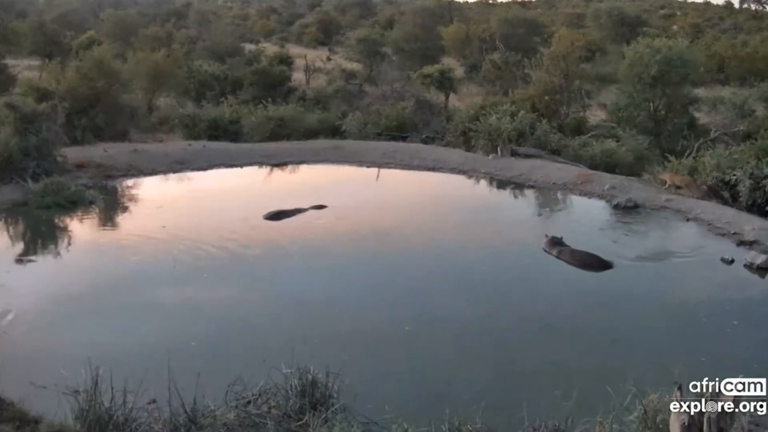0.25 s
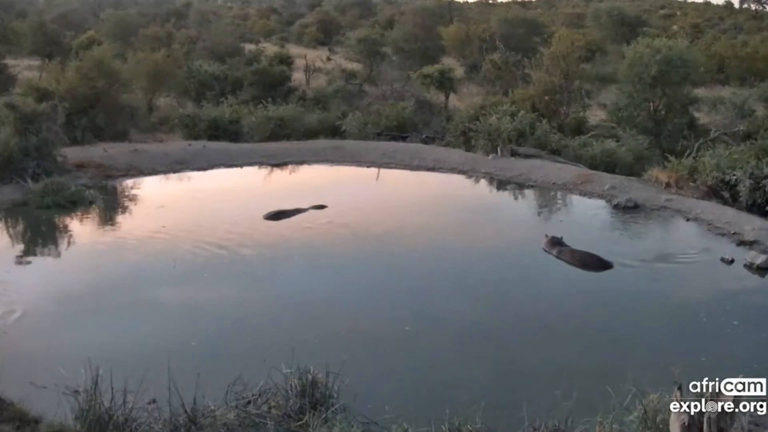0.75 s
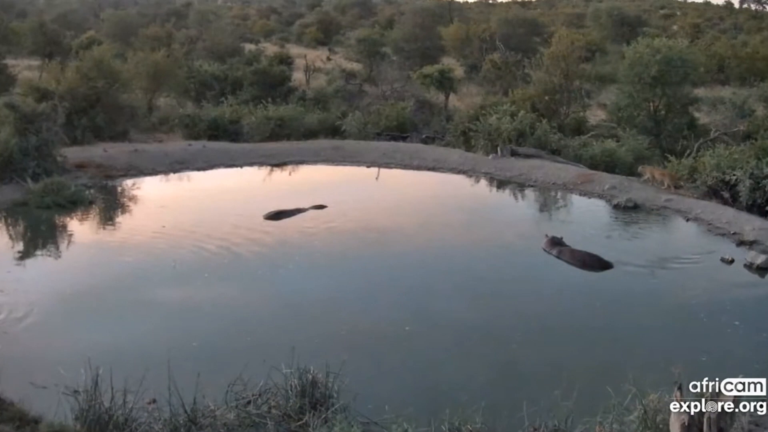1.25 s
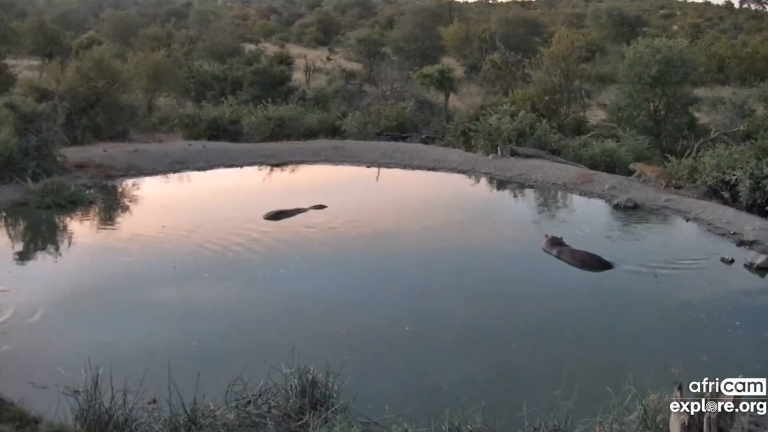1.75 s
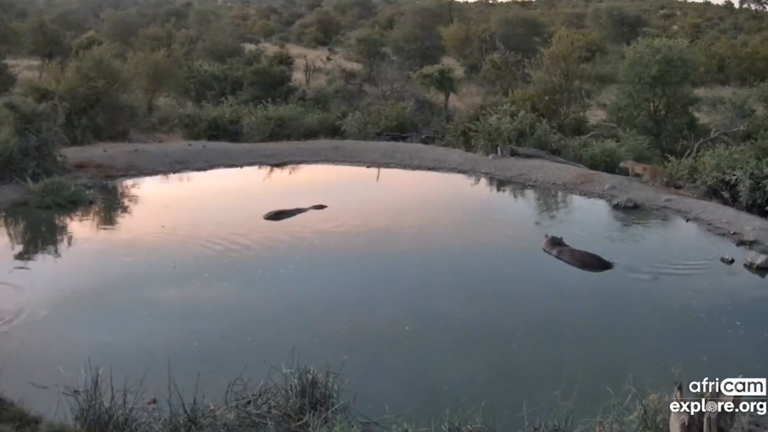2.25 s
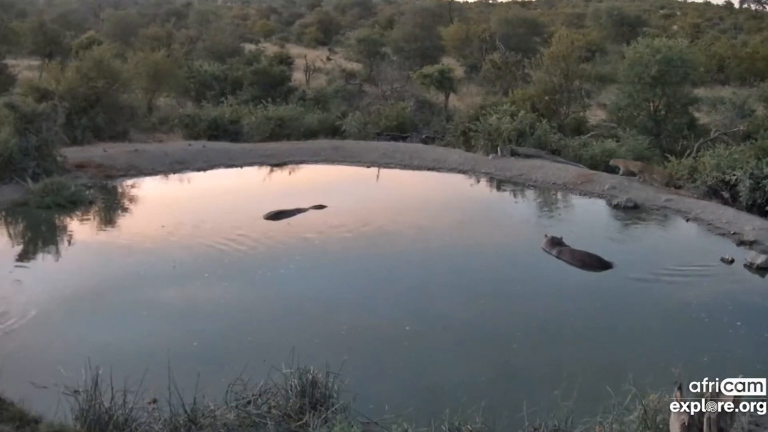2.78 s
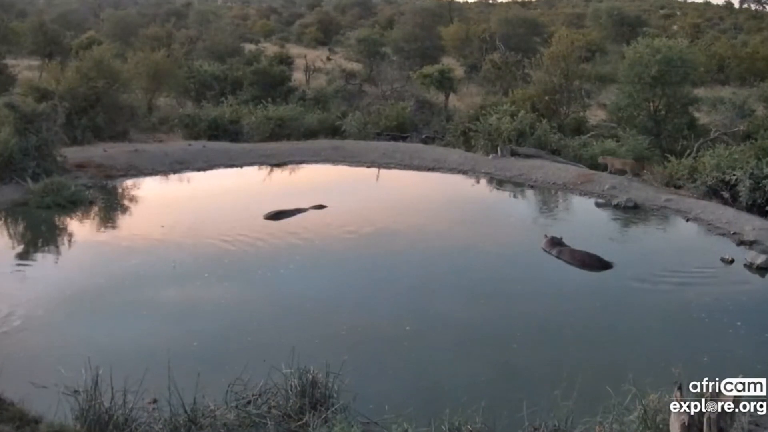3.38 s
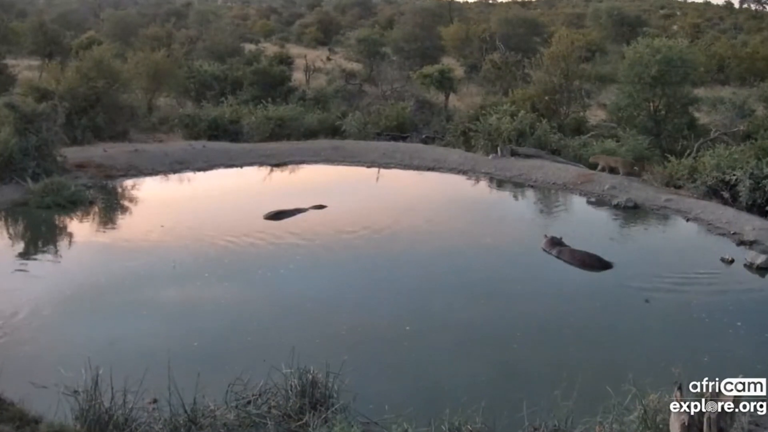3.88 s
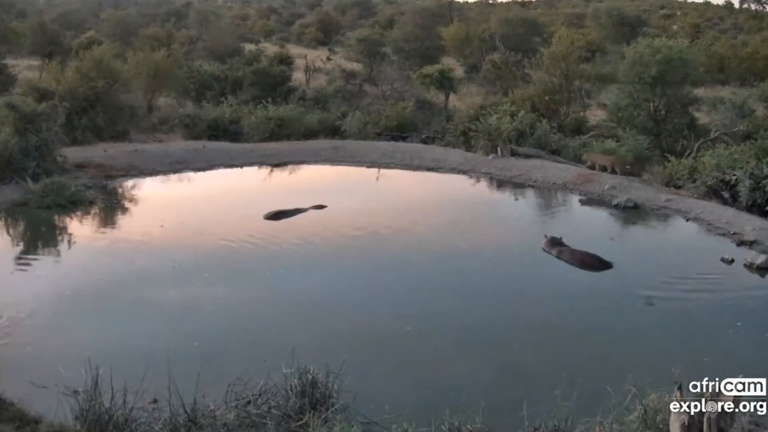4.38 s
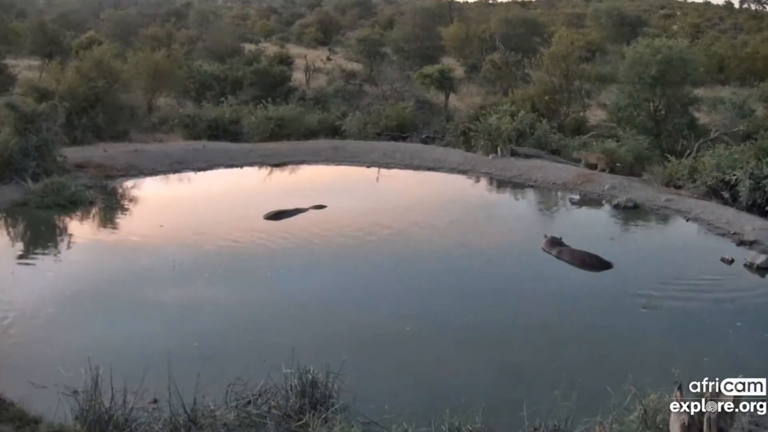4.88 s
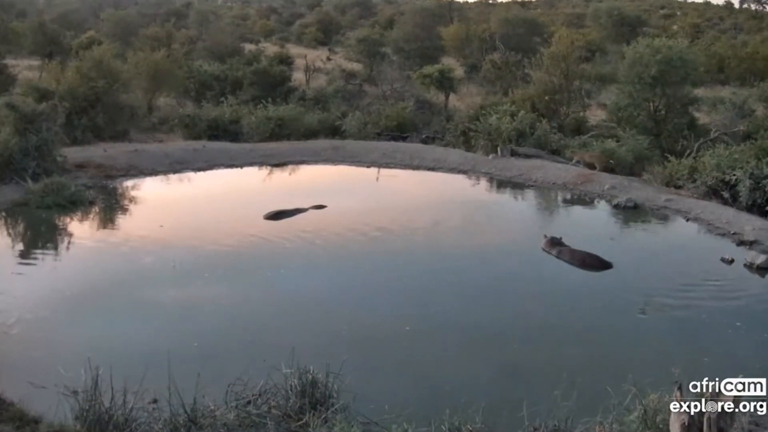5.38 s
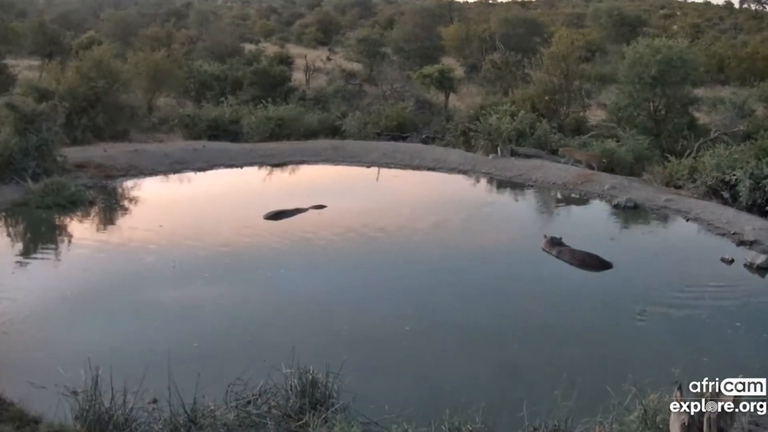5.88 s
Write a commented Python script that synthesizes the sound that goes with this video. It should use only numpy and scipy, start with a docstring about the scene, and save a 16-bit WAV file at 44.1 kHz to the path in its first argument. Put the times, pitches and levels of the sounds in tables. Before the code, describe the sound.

A bird whistles two rising phrases, warbles, then squawks and rasps over softly buzzing insects at a waterhole.

```python
"""Insects hiss and buzz in swells over a low motor hum, and small plops ring at a bush waterhole.
After a faint, far call, a bird whistles two rising phrases, the second ending in a quick warble;
a nasal squawk and a rasp follow. The whistle is an almost pure tone from the syrinx, the harsh calls
are stacks of partials mixed with turbulent air, and the insects are bands of noise.
The scrub scatters every call back across the water."""
import sys
import numpy as np
from scipy import signal
from scipy.fft import rfft, irfft
from scipy.io import wavfile
from scipy.ndimage import uniform_filter1d

SR = 44100
rng = np.random.default_rng(int(sys.argv[2]) if len(sys.argv) > 2 else 0)


def store_pcm(level_fs):
    """Save levels as 16-bit WAV."""
    pcm = np.round(np.clip(level_fs, -1, 1) * 32767).astype(np.int16)
    wavfile.write(sys.argv[1], SR, np.atleast_2d(pcm).T)


N = 270774
TIME = np.arange(N) / SR

# Spectra of the steady air and insect hiss. Each row: frequency in Hz, relative density in dB.
AIR_SPECTRUM = [(30, -48), (55, -46), (75, -24), (100, -19.5), (128, -6), (170, 1), (250, -4.5),
                (400, -7.5), (600, -11), (800, -18.5), (1100, -8), (1500, -5.5), (2200, -8), (3000, -23)]
INSECT_SPECTRUM = [(1500, -22), (2200, -6.5), (2700, 0), (3100, 2), (3800, 0), (4400, 0.5), (5200, -4.5),
                   (6000, -7), (7000, -8.5), (8000, -14), (9500, -14.5), (11000, -10), (12200, -11)]
# Hum of a distant motor. Each row: multiple of its turning rate, relative level in dB.
MOTOR_HARMONICS = [(3, -92), (5, -80), (6, -67.5), (7, -75), (9, -87), (10, -77), (11, -79), (12, -92),
                   (13, -85), (14, -76.5), (15, -81), (18, -86)]
# Buzzing swells in the bushes. Each row: time of the crest in seconds, level in dB.
BUZZ_SWELLS = [(.36, -59.5), (.905, -49.5), (1.59, -56), (2.115, -49), (2.70, -57), (3.21, -49.6),
               (3.82, -59.5), (4.25, -56), (4.66, -50), (5.22, -55.5), (5.55, -58.5), (5.80, -51.2),
               (6.07, -59.5)]
# A loud swell stops sooner, sits lower and rattles more. Each pair: soft swell, loud swell.
SWELL_RANGE_DB, SWELL_FALL_S, SWELL_HZ, SWELL_RATTLE = (-56, -50), (.095, .039), (4980, 4800), (.2, .44)
# Thin notes that lead into loud buzzes.
# Each row: start in seconds, length in seconds, opening pitch in Hz, relative level in dB.
LEAD_IN_NOTES = [(.74, .20, 4400, -56.5), (1.91, .15, 4360, -55.5)]
# Plops and ticks at the water's edge.
# Each row: start in seconds, level in dB, pitch in Hz, time to decay by 60 dB in seconds.
WATER_PLOPS = [(.022, -36, 1283, 0.036), (.61, -46, 1380, .04), (1.224, -42.5, 490, 0.022),
               (3.94, -39, 4600, .025), (5.461, -33, 1340, 0.015)]
# Echoes from the banks. Each row: delay in seconds, gain before filtering in dB.
BANK_ECHOES = [(.09, -21.5), (.145, -24.5)]

# Nasal calls. Each holds: start and length in seconds, opening and top pitch in Hz,
# level in dB, closing sag as a share of the pitch.
DISTANT_CALL = (1.985, .193, 510, 598, -56.6, .09)
SQUAWK_CALL = (4.312, .197, 685, 1072, -34.2, .06)
# Partials of the harsh voices; the squawk has side tones between its harmonics.
# Each row: multiple of the pitch, relative level in dB.
DISTANT_HARMONICS = [(3, -7.5), (4, -4.5), (5, -5)]
SQUAWK_OVERTONES = [(1.31, -29), (2, -16), (2.34, -24), (2.62, -12), (3, -.5), (3.38, -17), (3.62, -12.5),
                    (3.9, -20), (4, -19)]
RASP_HARMONICS = [(2, -18), (3, -2.5), (4, -9.5)]
# Throat resonances in the rasp. Each row: centre in Hz, width in Hz, relative level in dB.
THROAT_MODES = [(1624, 360, -19.5), (2280, 550, -14), (3120, 820, -5.5), (3830, 330, -0.5), (4130, 150, -5),
                (4570, 600, -5)]

# Whistled phrases; the climb changes pace at a knee. Each row: start in seconds, opening and low pitch
# in Hz, knee in seconds and Hz, crest in seconds and Hz, closing pitch in Hz, base level in dB.
WHISTLE_PHRASES = [(2.530, 1490, 1172, 2.938, 1530, 3.079, 2060, 1305, -30.2),
                   (3.414, 1555, 1330, 3.560, 1720, 3.648, 2020, 1365, -30.8)]
# Quick notes of the warble. Each row: time of the top in seconds, top pitch in Hz, base level in dB.
WARBLE_NOTES = [(3.772, 1920, -29.8), (3.845, 1918, -29.8), (3.918, 1895, -30.2), (3.988, 1820, -30),
                (4.048, 1780, -30.6), (4.101, 1660, -32.3)]
# How strongly each pitch of the whistle carries. Each row: pitch in Hz, gain in dB.
WHISTLE_CARRY = [(1200, -11.5), (1265, -8.5), (1355, .3), (1410, -.8), (1470, .3), (1620, -1), (1765, 3.2),
                 (1900, .6), (2015, -.3), (2060, 4)]


def from_db(db):
    """Decibels measure an amplitude ratio logarithmically."""
    return 10 ** (np.asarray(db) / 20)


def rms_one(x):
    """Dividing by the rms gives unit power."""
    return x / np.sqrt(np.mean(x ** 2) + 1e-20)


def ramp(start_s, length_s):
    """A linear rise from 0 to 1."""
    return np.clip((TIME - start_s) / length_s, 0, 1)


def gate(start_s, end_s, edge_s):
    """A time window with sloping edges."""
    return ramp(start_s - edge_s / 2, edge_s) - ramp(end_s - edge_s / 2, edge_s)


def phase_of(hz):
    """Phase is the integral of frequency."""
    return 2 * np.pi * np.cumsum(hz) / SR


def shaped_noise(gain_at):
    """Spectral shaping: white noise weighted at each frequency, at unit rms."""
    hz = np.arange(N // 2 + 1) * SR / N + 1e-3
    return rms_one(irfft(rfft(rng.standard_normal(N)) * gain_at(hz), N))


def coloured_noise(points):
    """Broadband noise follows a (Hz, dB) spectrum, interpolated in log frequency."""
    at, db = np.transpose(points)
    return shaped_noise(lambda hz: from_db(np.interp(np.log(hz), np.log(at), db)))


def resonant_noise(centre_hz, width_hz):
    """A resonance passes the noise near its centre."""
    return shaped_noise(lambda hz: 1 / (1 + ((hz - centre_hz) / width_hz * 2) ** 2))


def noise_around(phase, width_hz):
    """Quadrature modulation centres a band of noise on a moving frequency."""
    def skirt(hz):
        return 1 / np.sqrt(1 + (2 * hz / width_hz) ** 6)
    return shaped_noise(skirt) * np.sin(phase) + shaped_noise(skirt) * np.cos(phase)


def drift(rate_hz):
    """Low-passed noise gives a random wander of unit rms."""
    return shaped_noise(lambda hz: 1 / (1 + (hz / rate_hz) ** 2))


def motor_hum(turning_hz, gain_db, waver_db):
    """Periodic rotation radiates harmonics of the turning rate; each wavers a little in level."""
    return np.sqrt(2) * sum(from_db(db + gain_db + waver_db * drift(3.9))
                            * np.sin(2 * np.pi * (k * turning_hz * TIME + rng.random()))
                            for k, db in MOTOR_HARMONICS)


def insect_buzz(stroke_hz, rise_s, climb_hz_per_s, width_hz):
    """Amplitude modulation chops a swelling, climbing band of noise into a rattle."""
    crest_s, db = np.array(BUZZ_SWELLS).T[:, :, None]
    fall_s, centre_hz, depth = (np.interp(db, SWELL_RANGE_DB, pair)
                                for pair in (SWELL_FALL_S, SWELL_HZ, SWELL_RATTLE))
    age = TIME - crest_s
    taper = np.where(age < 0, 2 * (age / rise_s) ** 2, (age / fall_s) ** 4)
    power = from_db(db) ** 2 * np.exp(-taper) + 1e-18
    share = power / power.sum(0)   # overlapping swells blend by their power
    hz = (share * (centre_hz + climb_hz_per_s * age)).sum(0)
    chop = np.tanh(2 * np.sin(phase_of(stroke_hz * (1 + .077 * drift(18.6)))))
    rattle = rms_one(1 + (share * depth).sum(0) * chop)
    return np.sqrt(power.sum(0)) * rattle * noise_around(phase_of(hz), width_hz)


def lead_ins(gain_db, climb_hz_per_s):
    """Linear frequency sweeps: thin, noisy notes creep upward."""
    out = np.zeros(N)
    for start, length, opening_hz, db in LEAD_IN_NOTES:
        hz = opening_hz + climb_hz_per_s * length * ramp(start, length)
        level = gate(start, start + length, edge_s=.03) * from_db(db + gain_db)
        out += level * whistle(hz, jitter=.0071, flutter_db=1, noise_db=-2)
    return out


def plops(attack_s):
    """Damped oscillation: each plop is a sinusoid that decays exponentially."""
    out = np.zeros(N)
    for start, db, hz, t60 in WATER_PLOPS:
        age = np.maximum(TIME - start, 0)
        level = from_db(db - 60 * age / t60) * (1 - np.exp(-age / attack_s))
        out += level * np.sin(2 * np.pi * hz * age)
    return out


def scrub_echoes(x, near_db, near_t60, far_db, far_t60):
    """Scattering: ground and near twigs answer at once, banks and far bushes later, all band-limited."""
    age = TIME[:int(1.5 * SR)]
    response = np.zeros(len(age))
    for db, t60, onset_s in [(near_db, near_t60, .002), (far_db, far_t60, .04)]:
        scatter = rng.standard_normal(len(age)) * from_db(-60 * age / t60) * (1 - np.exp(-age / onset_s))
        response += from_db(db) * scatter / np.linalg.norm(scatter)
    for delay, db in BANK_ECHOES:
        response[int(delay * SR)] += from_db(db)
    band = signal.butter(2, [1300, 2700], "band", fs=SR, output="sos")
    return signal.fftconvolve(x, signal.sosfilt(band, response))[:N]


def ground_notch(x, notch_hz, width_hz, depth):
    """Destructive interference: reflections weaken one narrow band, so a glide dips on crossing it."""
    b, a = signal.iirnotch(notch_hz, notch_hz / width_hz, fs=SR)
    return x + depth * (signal.lfilter(b, a, x) - x)


def reed(hz, partials, jitter, rough):
    """Superposition: partials share one unsteady pitch, each fluttering in level on its own."""
    phase = phase_of(hz * (1 + jitter * drift(253)))
    return np.sqrt(2) * sum(from_db(db) * np.sin(k * phase + rng.uniform(0, 2 * np.pi))
                            * (1 + rough * drift(200)) for k, db in partials)


def nasal_call(call, partials, jitter, rough, swell_db, hoarseness, scoop_s=.059, sag_s=.032):
    """Effort pulls pitch and level up; while slack, the voice puffs air at a subharmonic rate."""
    start, length, opening_hz, top_hz, db, sag_share = call
    effort = 1 - np.exp(-(np.clip(TIME - start, 0, length) / scoop_s) ** 2.5)
    sag = ramp(start + length - sag_s, sag_s) ** 2
    hz = (opening_hz + (top_hz - opening_hz) * effort) * (1 - sag_share * sag)
    hoarse = np.clip(hoarseness * (1 - effort ** 4 + sag ** 2), 0, 1)
    phase = phase_of(hz)
    air = noise_around(phase * 3, width_hz=270) + from_db(2) * noise_around(phase * 3.6, width_hz=1300)
    puffs = rms_one(air * (1 + np.cos(phase / 3)))   # one puff every third cycle
    voice = np.sqrt(1 - hoarse ** 2) * reed(hz, partials, jitter, rough) + hoarse * puffs
    level = from_db(db - swell_db * (1 - effort ** 1.3))
    return gate(start, start + length, edge_s=.005) * level * voice


def throat_noise():
    """Turbulent air excites the resonances of the bird's throat."""
    return rms_one(sum(from_db(db) * resonant_noise(hz, width) for hz, width, db in THROAT_MODES))


def rasp(start_s, length_s, hz, db, voice_db, air_db):
    """Amplitude modulation of voice and throat noise: harsh pulses quicken and merge as they fade."""
    attack_s, fade_db_per_s, release_s, release_db, sag_share = .021, 45, .036, 6, .08
    pulse_hz, quicken_hz_per_s, merge_s = 66, 150, .07
    end_s = start_s + length_s
    age = np.clip(TIME - start_s, 0, length_s)
    release = ramp(end_s - release_s, release_s)
    depth = 1 / (1 + (age / merge_s) ** 2)
    pulse_phase = 2 * np.pi * age * (pulse_hz + quicken_hz_per_s * age / 2)
    pulses = 1 - depth * (.5 + .5 * np.cos(pulse_phase))
    level = ramp(start_s, attack_s) * from_db(db - fade_db_per_s * age - release_db * release)
    voice = reed(hz * (1 - sag_share * release), RASP_HARMONICS, jitter=.011, rough=.34)
    source = from_db(air_db) * throat_noise() + from_db(voice_db) * voice
    return gate(start_s, end_s, edge_s=.004) * pulses * level * source


def whistle(hz, jitter, flutter_db, noise_db, hiss=0):
    """Random modulation makes an almost pure tone tremble; a band of noise follows its pitch."""
    phase = phase_of(hz * (1 + jitter * drift(199)))
    tone = np.sqrt(2) * np.sin(phase) + from_db(noise_db) * noise_around(phase, width_hz=930)
    return from_db(flutter_db * drift(120)) * (tone + hiss)


def phrase_turns(phrase):
    """A pitch contour as turning points (s, Hz, dB): a flick up and down, a long climb and a fall."""
    start, opening, low, knee_s, knee, crest_s, crest, closing, db = phrase
    flick_hz, flick_s, drop_s, settle_s = 1945, .048, .023, .020
    hold_s, fall_s, close_s = .021, .028, .053
    drop_left, fall_left = .11, .45   # share of each descent left after its fast part
    dropped_s, fallen_s = start + flick_s + drop_s, crest_s + hold_s + fall_s
    flick = [(start, opening), (start + flick_s, flick_hz)]
    drop = [(dropped_s, low + drop_left * (flick_hz - low)), (dropped_s + settle_s, low)]
    climb = [(knee_s, knee), (crest_s, crest), (crest_s + hold_s, crest)]
    fall = [(fallen_s, closing + fall_left * (crest - closing)), (fallen_s + close_s, closing)]
    return [(s, hz, db) for s, hz in flick + drop + climb + fall]


def with_warble(turns, lead_s, hold_s, between_hz):
    """Frequency modulation: the fall of a phrase bounces into quick notes, then slides away."""
    slide_s, last_hz, last_db = .043, 1330, -34
    tops_s = np.array(WARBLE_NOTES)[:, 0]
    closing_hz = turns[-1][1]
    midpoints_s = (tops_s[:-1] + tops_s[1:]) / 2
    dips = [(tops_s[0] - lead_s, closing_hz)] + [(s, between_hz) for s in midpoints_s]
    notes = []
    for (dip_s, dip_hz), (top_s, top_hz, db) in zip(dips, WARBLE_NOTES):
        notes += [(dip_s - hold_s / 4, dip_hz, db), (dip_s + hold_s / 4, dip_hz, db)]
        notes += [(top_s - hold_s / 2, top_hz, db), (top_s + hold_s / 2, top_hz, db)]
    slide = [(tops_s[-1] + slide_s / 2, between_hz, last_db), (tops_s[-1] + slide_s, last_hz, last_db)]
    return turns[:-1] + notes + slide


def song(turns, jitter, flutter_db, noise_db, hiss):
    """Continuous glide: the syrinx rounds each turn of the contour, and loudness follows pitch."""
    slur_s, soft_start_s, soft_start_db = .012, .025, 3.5
    waver_share, waver_db, waver_hz = .004, .5, 16
    times, hz, db = np.transpose(turns)
    pitch = uniform_filter1d(np.interp(TIME, times, hz), int(slur_s * SR))
    pitch *= 1 + waver_share * drift(waver_hz)
    carry_db = np.interp(pitch, *np.transpose(WHISTLE_CARRY))
    level_db = np.interp(TIME, times, db) + carry_db + waver_db * drift(waver_hz)
    level_db -= soft_start_db * (1 - ramp(times[0], soft_start_s))
    extra_noise_db = .012 * np.maximum(1650 - pitch, 0)   # the faint noise grows louder below 1650 Hz
    tone = whistle(pitch, jitter, flutter_db, noise_db + extra_noise_db, hiss)
    return gate(times[0], times[-1], edge_s=.003) * from_db(level_db) * tone


def scene():
    """Superposition: the calls, their echoes and the plops add to insects, air and hum."""
    hiss = from_db(-21) * coloured_noise(
        [(1100, -48), (1450, -2), (1800, 1), (2250, -2.5), (2450, -18), (3200, -45)])
    first, second = (phrase_turns(phrase) for phrase in WHISTLE_PHRASES)
    long_rise = song(first, jitter=.0024, flutter_db=.54, noise_db=-25, hiss=hiss)
    warble = song(with_warble(second, lead_s=.040, hold_s=.014, between_hz=1420),
                  jitter=.003, flutter_db=1.2, noise_db=-26, hiss=from_db(2) * hiss)
    squawk = nasal_call(SQUAWK_CALL, SQUAWK_OVERTONES,
                        jitter=.00706, rough=.24, swell_db=12.5, hoarseness=.62)
    harsh = squawk + rasp(start_s=4.6, length_s=.157, hz=1028, db=-31.2, voice_db=-4.5, air_db=-1.8)
    far = nasal_call(DISTANT_CALL, DISTANT_HARMONICS, jitter=.005, rough=.35, swell_db=5, hoarseness=.1)
    direct = (ground_notch(long_rise, notch_hz=1655, width_hz=68, depth=.5)
              + ground_notch(warble, notch_hz=1668, width_hz=72, depth=.82)
              + harsh + far + plops(attack_s=.0014))
    echoes = scrub_echoes(long_rise + warble + harsh + far,
                          near_db=-17, near_t60=.069, far_db=-17.2, far_t60=1.1)
    insects = (from_db(-52) * coloured_noise(INSECT_SPECTRUM)
               + insect_buzz(stroke_hz=56, rise_s=.145, climb_hz_per_s=650, width_hz=760)
               + lead_ins(gain_db=-2.5, climb_hz_per_s=600))
    air = from_db(-58) * coloured_noise(AIR_SPECTRUM)
    hum = motor_hum(turning_hz=25, gain_db=-1, waver_db=1.6)
    return (direct + echoes + insects + air + hum)[None]


def record(dry):
    """Band limiting: a high-pass drops the deep bass and a steep low-pass cuts the top."""
    thinned = signal.sosfilt(signal.butter(3, 52, "high", fs=SR, output="sos"), dry)
    return signal.sosfilt(signal.ellip(12, .2, 70, 12300, fs=SR, output="sos"), thinned)


dry = scene()
out = record(dry)
store_pcm(out)
```